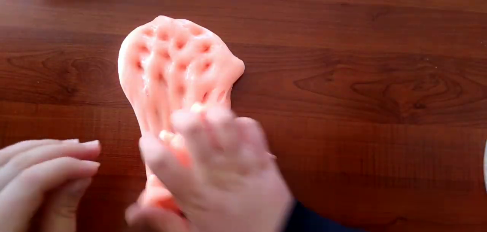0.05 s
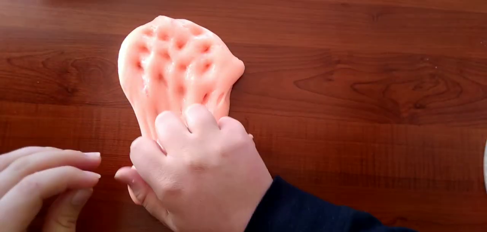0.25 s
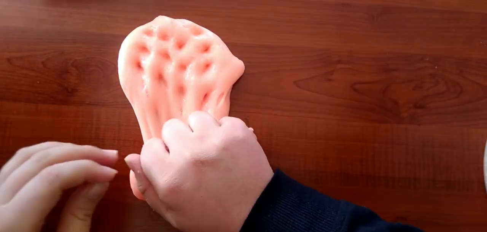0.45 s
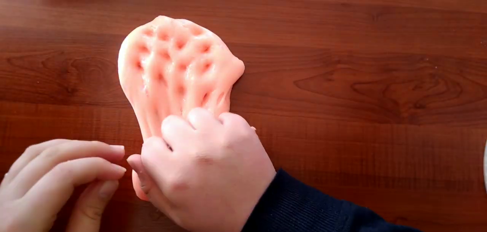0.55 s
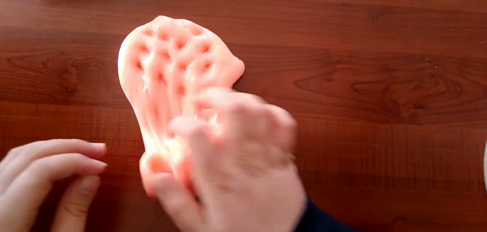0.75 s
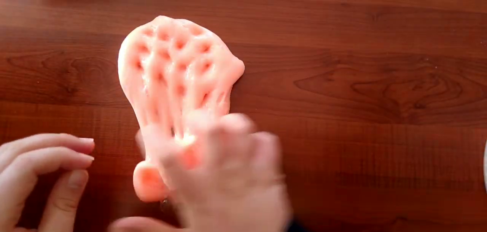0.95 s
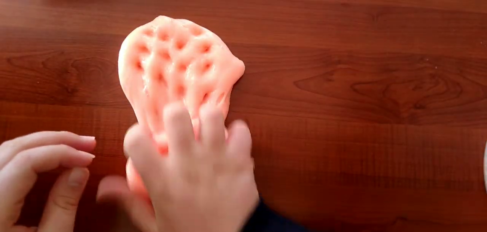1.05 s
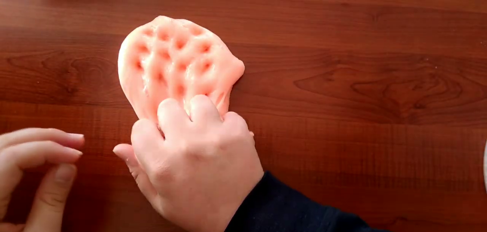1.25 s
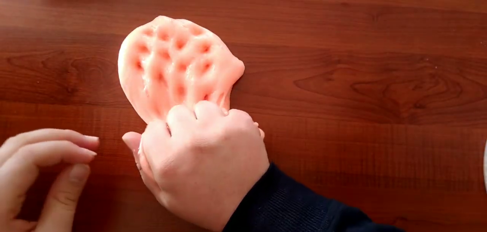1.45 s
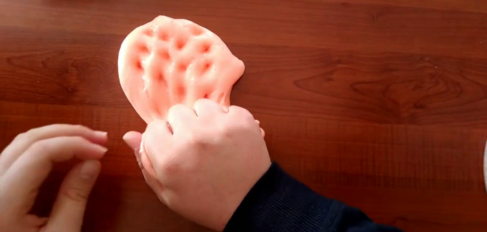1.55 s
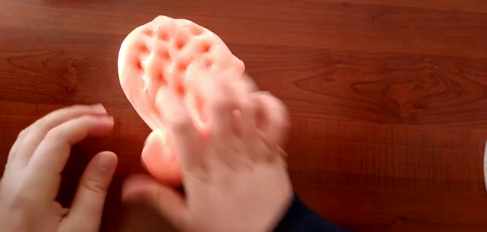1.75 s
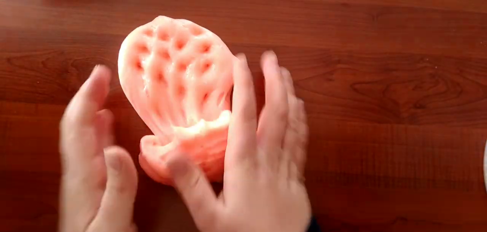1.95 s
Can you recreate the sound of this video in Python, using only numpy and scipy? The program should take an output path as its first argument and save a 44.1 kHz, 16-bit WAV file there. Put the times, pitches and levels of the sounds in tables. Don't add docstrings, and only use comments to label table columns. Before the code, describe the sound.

Trapped air pockets pop in squeezed slime on a wooden table, with tiny bubbles and squishes

```python
import sys
import numpy as np
from scipy import signal
from scipy.fft import rfft, irfft, next_fast_len
from scipy.io import wavfile
from scipy.ndimage import map_coordinates

SR = 44100
rng = np.random.default_rng(int(sys.argv[2]) if len(sys.argv) > 2 else 0)


def unload_wav(signal):
    wavfile.write(
        sys.argv[1],
        SR,
        np.round(np.clip(np.atleast_2d(signal).T, -1, 1) * 32767).astype(np.int16),
    )


def volts(x):
    e = np.asarray(x, float) / 20
    return 10 ** e


N = 88200


def unit(x):
    return x / np.sqrt(np.mean(x ** 2) + 1e-20)


def along(points, hz):
    f, v = np.transpose(points)
    return np.interp(np.log(hz + 1), np.log(f + 1), v)


def filtered(x, response):
    n = x.shape[-1]
    m = next_fast_len(n + SR // 4)
    return irfft(rfft(x, m) * response(np.fft.rfftfreq(m, 1 / SR)), m)[..., :n]


def spans(rows, edge_s):
    t = np.arange(N) / SR
    return np.array([np.clip(np.minimum(t - r[0], r[1] - t) / edge_s + .5, 0, 1) for r in rows])


def wobble(rate_hz):
    knots = rng.standard_normal(int(N * rate_hz / SR) + 4)
    return map_coordinates(knots, [np.arange(N) * rate_hz / SR])


def blend(a, shared):
    return np.sqrt(shared) * a[0] + np.sqrt(1 - shared) * a[1:]


def noise(spectrum, shared):
    both = blend(rng.standard_normal((3, N)), shared)
    return unit(filtered(both, lambda hz: volts(along(spectrum, hz))))


# freq_hz, level_db
HUSH_COLOUR = [(25, -7), (160, -0.5), (400, -8), (1000, -12), (2300, -17), (2800, -28.5), (3300, -42),
               (5000, -81)]
# time_s, level_db
HUSH_LEVEL = [(0, -73.5), (0.052, -86), (0.069, -55.5), (.2, -73), (0.298, -53), (0.751, -63.5),
              (0.968, -68.5), (1.201, -67.5), (1.448, -60.5), (1.532, -73.5), (1.598, -72.5), (1.701, -63),
              (1.849, -62.5), (2, -71)]
RUMBLE_DB, RUMBLE_HZ, HISS_DB = -59.5, 70, -89


def hush():
    s, db = np.transpose(HUSH_LEVEL)
    air_db = np.interp(np.arange(N) / SR, s, db) + 3.5 + 1.5 * wobble(20)
    air = volts(air_db) * noise(HUSH_COLOUR, shared=0.74)
    rumble = noise([(12, -20), (28, 0), (RUMBLE_HZ, -6), (160, -25), (400, -80)], shared=.4)
    rumble = volts(RUMBLE_DB + 3.5 * wobble(3)) * rumble
    hiss = volts(HISS_DB) * rng.standard_normal((2, N))
    return air + rumble + hiss


POP_S = [.0608, .2337, .4024, .4421, .5052, 1.2331, 1.3378, 1.3468, 1.7426]
# peak_db, spike_rolloff_hz, snap_over_spike_db, table_boom_db, left_over_right_db
POPS = [
    (-35.5, 800, -42, 8, 1),
    (-1.5, 2070, -24, 6, 1),
    (-25.5, 1500, -7.5, -24.5, 5.5),
    (-5, 2600, -9, -28.5, -2.5),
    (-19.5, 18000, 1, -20.5, 0.5),
    (-10, 4620, -16.5, 8.5, 7.5),
    (-37, 1500, -0.5, -23, 20.5),
    (-16, 1960, -16, 8.5, 0.5),
    (-26, 3100, -19.5, -19, 6),
]
# pitch_hz, width_hz, level_db
TABLE = [(1140, 590, 10), (2084, 590, 16), (4200, 2600, -16.5)]
TABLE_DB, BOOM_HZ, BOOM_WIDTH_HZ = -6.5, 335, 160
BOUNCE_S, BOUNCE_DB = 0.002422, -17.5
TEAR_S, TEAR_DB, LOW_CUT_HZ, SNAP_TILT = .0035, -8, 110, 1.3


def ring(f, pitch_hz, width_hz):
    return 1j * f * width_hz / (pitch_hz ** 2 - f * f + 1j * f * width_hz)


def big_pockets(t):
    for s, (peak_db, rolloff_hz, snap_db, boom_db, pan_db) in zip(POP_S, POPS):
        tear_s = rng.random(6) * TEAR_S + 0.00059
        tear_size = volts(TEAR_DB) * rng.uniform(-0.64, 1, 6)
        low_cut_hz = LOW_CUT_HZ * volts(-.55 * boom_db)

        def shape(f):
            bounce = volts(BOUNCE_DB) * np.exp(-2j * np.pi * f * BOUNCE_S)
            tears = np.exp(-2j * np.pi * f[:, None] * tear_s) @ tear_size
            wood = sum(volts(db) * ring(f, hz, width) for hz, width, db in TABLE)
            boom = volts(boom_db) * ring(f, BOOM_HZ, BOOM_WIDTH_HZ)
            table = 1 + volts(TABLE_DB) * wood + boom
            spike = np.exp(-(f / rolloff_hz) ** 2) * (1j * f / (low_cut_hz + 1j * f)) ** 2
            return (1 + bounce + tears) * table * spike

        sign = np.sign(s - .1)
        body = sign * filtered(1. * (t == 0), shape)
        yield s, peak_db, body, snap_db, pan_db, SNAP_TILT * np.log2(rolloff_hz / 2800)


BUBBLE_S = [.1162, .136, .193, .285, .332, .468, .808, .865, 1.045, 1.184, 1.218, 1.433, 1.485, 1.633,
            1.652, 1.705, 1.834, 1.8815]
BUBBLE_HZ = [2100, 2300, 2000, 1500, 6800, 2000, 5300, 900, 90, 2300, 2000, 2200, 1800, 5000, 7000, 420,
             950, 2500]
# peak_db, snap_over_body_db, left_over_right_db
BUBBLES = [(-50, -8, 0), (-47.5, -15, 7), (-60.5, -29, 5), (-33, 0, 1), (-38, -11.5, 6.5),
           (-41.5, -0.5, 0.5), (-55, -20, 0), (-52, -25, 8), (-42.5, -51.5, -1.5), (-43.5, -27, 3),
           (-57, -8, 3), (-45.5, -4, 3), (-46, -23, 6), (-67.5, 7, -1), (-61.5, -15, 11), (-43.5, -8.5, 3),
           (-37, -32, 8), (-45.5, -38, -2.5)]
BUBBLE_CYCLES, REFERENCE_HZ = 8, 1000
BUBBLE_RISE = .9


def small_pockets(t):
    for s, hz, (peak_db, snap_db, pan_db) in zip(BUBBLE_S, BUBBLE_HZ, BUBBLES):
        cycles = np.maximum(t, 0) * hz
        decay = volts(-60 * cycles / BUBBLE_CYCLES / np.sqrt(hz / REFERENCE_HZ))
        body = np.sin(2 * np.pi * cycles) * decay * (1 - np.exp(-cycles / BUBBLE_RISE))
        yield s, peak_db, body, snap_db, pan_db, .5


def pockets(t):
    yield from big_pockets(t)
    yield from small_pockets(t)


# freq_hz, t60_s
ROOM = [(150, 1), (400, 0.16), (1040, 0.35), (2760, 0.42), (7280, 0.3), (14000, .25)]
# freq_hz, level_db
ROOM_COLOUR = [(100, -2.5), (350, 6.5), (2200, -3), (3200, 4), (4800, 6), (8000, 1), (12000, 2),
               (16000, -27)]
ROOM_DB, ROOM_SHARED, ROOM_GAP_S, ROOM_RISE_S = -8.5, 0.14, .008, .004


def room(x):
    hz, t, z = signal.stft(rng.standard_normal((3, SR // 2)), SR, nperseg=128)
    decay_db = along(ROOM_COLOUR, hz)[:, None] - 60 * t / along(ROOM, hz)[:, None]
    tail = blend(signal.istft(z * volts(decay_db), SR, nperseg=128)[1], ROOM_SHARED)
    rise = np.clip((np.arange(tail.shape[1]) / SR - ROOM_GAP_S) / ROOM_RISE_S, .1, 1)
    tail = tail * rise
    return volts(ROOM_DB) * signal.fftconvolve(x[None], tail / np.linalg.norm(tail[0]), axes=1)


# freq_hz, level_db
SNAP = [(1500, -31), (3200, -6), (4600, 1.5), (7500, -7.5), (9000, -19.5), (12000, -25.5), (14000, -39),
        (17000, -68.5)]
# delay_s, level_db
ECHOES = [
    (.0098, -20),
    (0.0144, -23.5),
    (0.017, -17.5),
    (0.031, -26.5),
]
SNAP_T60, RIGHT_LAG_S = 0.013, 4 / SR


def late(x):
    lag_s = np.array([[0], [RIGHT_LAG_S]])
    return filtered(x[:, :N], lambda f: np.exp(-2j * np.pi * f * lag_s))


def bursts():
    near, far = np.zeros((2, N + SR)), np.zeros((2, N + SR))
    lead = SR // 500
    t = (np.arange(SR // 12) - lead) / SR
    for s, peak_db, body, snap_db, pan_db, tilt in pockets(t):
        def colour(f):
            return volts(along(SNAP, f)) * (f / 5000 + 0.013) ** tilt

        air = rng.standard_normal((2, len(t))) * (t >= 0) * volts(-60 * t / SNAP_T60)
        snap = filtered(air, colour)
        body_gain = volts(peak_db) / np.abs(body).max()
        snap_gain = volts(peak_db + snap_db) / np.abs(snap).max()
        pop = body_gain * body + snap_gain * snap
        i = round(s * SR) - lead
        near[:, i:i + len(t)] += pop * volts(np.array([[pan_db / 2], [-pan_db / 2]]))
        for delay_s, echo_db in ECHOES:
            j = i + round(delay_s * SR)
            far[:, j:j + len(t)] += pop * volts(echo_db + rng.normal(0, 6, (2, 1)))
        click = np.linalg.norm(air[0]) * filtered(1. * (t == 0), colour)
        tail = room(body_gain * body + snap_gain * click)
        far[:, i:i + tail.shape[1]] += tail
    return late(near), late(far)


# start_s, end_s
TREBLE_OPEN = [
    (.225, .395),
    (.398, .745),
    (1.228, 1.42),
    (1.69, 1.795),
]
SPLIT_HZ, SHUT_DB, GATE_S = 2850, -29.5, 0.011


def suppress(x):
    high = filtered(x, lambda hz: 1 / (1 + (SPLIT_HZ / (hz + 1)) ** 12))
    is_open = np.clip(spans(TREBLE_OPEN, GATE_S).sum(axis=0), 0, 1)
    return x - high + high * volts(SHUT_DB * (1 - is_open))


# start_s, end_s, level_db, edge_s
SQUELCH = [
    (0.269, 0.335, -55.5, 0.035),
    (0.45, 0.555, -48.5, 0.011),
    (0.654, .745, -55, 0.031),
    (1.679, 1.748, -52, 0.031),
    (1.731, 1.792, -57.5, 0.037),
]
# freq_hz, level_db
WET = [(120, -38.5), (200, -17.5), (390, -5.5), (620, -15.5), (2100, -14), (3300, -26.5), (5000, -31),
       (7500, -28), (8800, -39.5), (15500, -61.5)]
# freq_hz, level_db
GRAIN = [(150, -31), (400, 1.5), (900, -10.5), (2200, -4.5), (3000, -19), (5000, -37)]
GRAIN_DB, GRAINS_PER_S, GRAIN_SPREAD_DB = -2, 1800, 4


def squelch():
    level = sum(volts(r[2]) * spans([r], r[3])[0] ** 2 for r in SQUELCH)
    chance, side, size = rng.random((3, N))
    sizes = volts(-GRAIN_SPREAD_DB * np.log(size + 0.0066))
    specks = (chance < GRAINS_PER_S / SR) * np.sign(side - .5) * sizes
    grains = unit(filtered(specks, lambda hz: volts(along(GRAIN, hz))))
    flutter = volts(1.6 * wobble(40) + 2.5 * wobble(300))
    return level * volts(GRAIN_DB) * grains + level * flutter * noise(WET, shared=0.84)


# start_s, size (full scale 1), back_to_zero_s, fade_s
PUFFS = [
    (0.443, 0.78, .044, 0.23),
    (0.5049, .43, 0.044, 0.051),
    (1.235, -0.073, 0.17, 0.038),
]
PUFF_RISE_S = .0003


def puffs():
    out, t = np.zeros(N), np.arange(N) / SR
    for s, size, zero_s, fade_s in PUFFS:
        u = np.maximum(t - s, 0)
        on = 1 - np.exp(-u / PUFF_RISE_S)
        out = out * (1 - on) + on * size * (1 - u / zero_s) * np.exp(-u / fade_s)
    return np.array([out, 0 * out])


def scene():
    near, far = bursts()
    return near + suppress(far + squelch()) + puffs() + hush()


# freq_hz, level_db
RIGHT_COLOUR = [(300, 0.5), (1500, 3), (6000, -2), (12000, 6)]
DIP_HZ, DIP_WIDTH_HZ, DIP_DB = 3130, 350, -4


def ports(hz):
    difference_db = along(RIGHT_COLOUR, hz) * np.array([[-.5], [.5]])
    dip_db = DIP_DB * np.exp(-((hz - DIP_HZ) / DIP_WIDTH_HZ) ** 2)
    return volts(difference_db + dip_db)


def low_pass(x):
    return signal.sosfilt(signal.butter(12, 16300, fs=SR, output="sos"), x)


def record(dry):
    mix = filtered(dry, ports)
    return low_pass(mix)


dry = scene()
out = record(dry)
unload_wav(out)
```